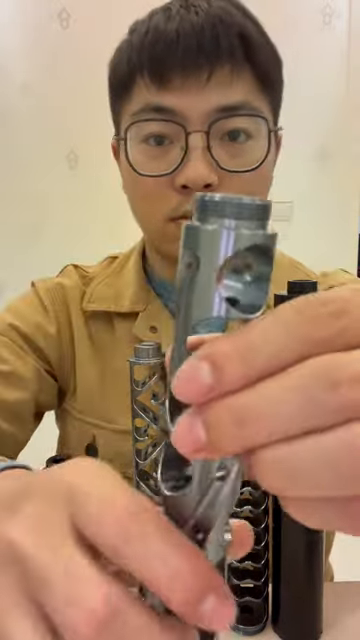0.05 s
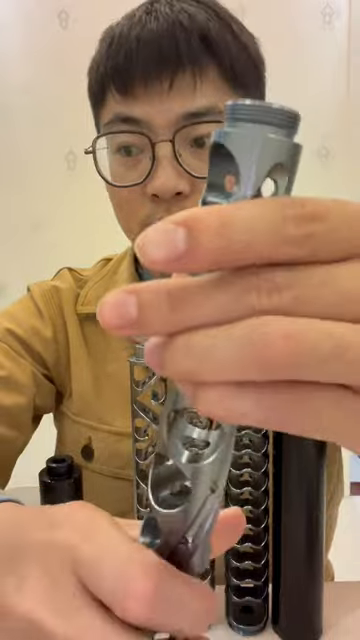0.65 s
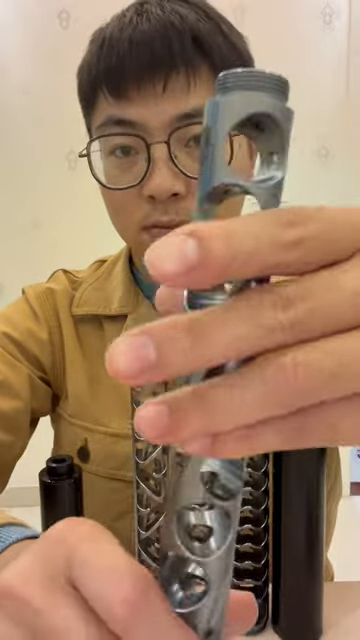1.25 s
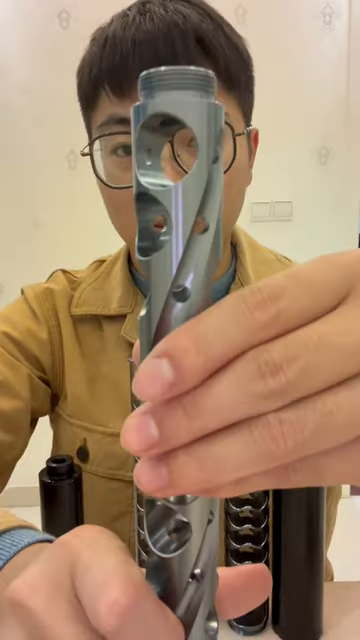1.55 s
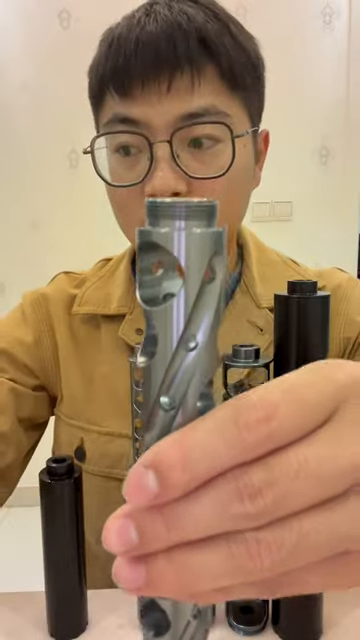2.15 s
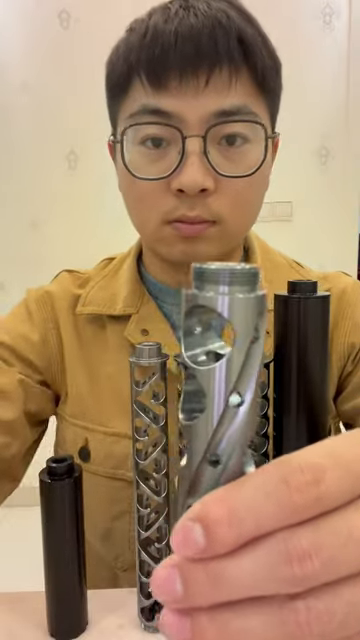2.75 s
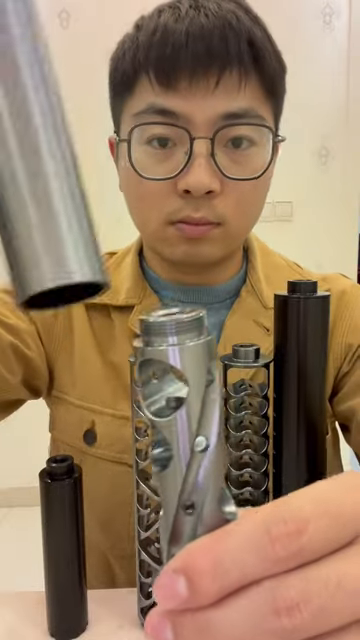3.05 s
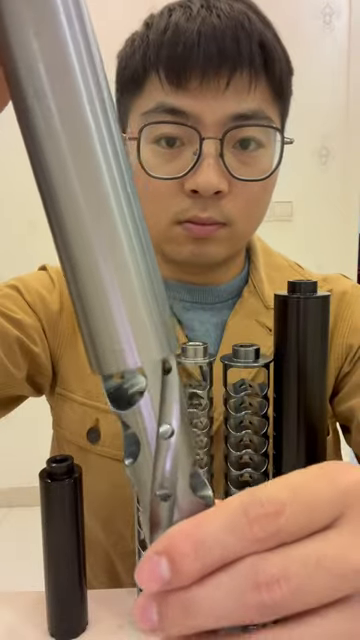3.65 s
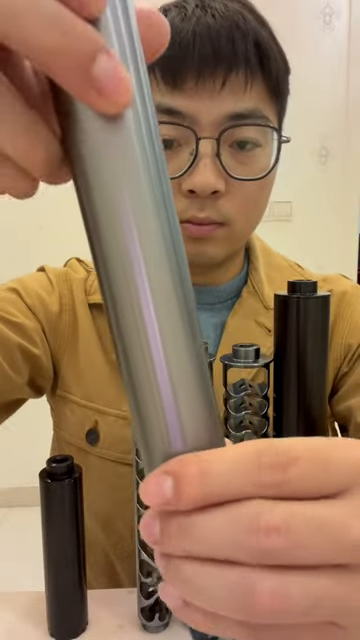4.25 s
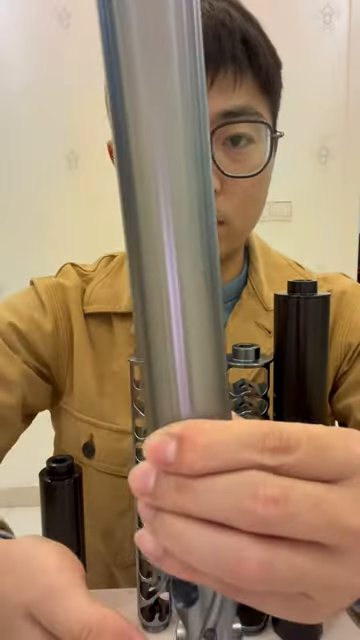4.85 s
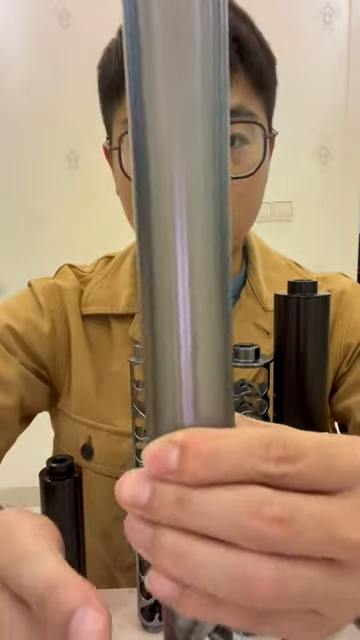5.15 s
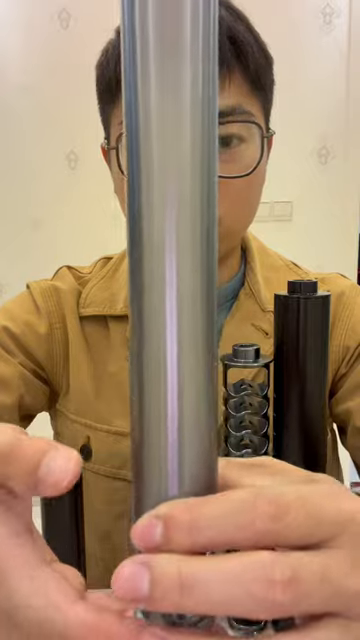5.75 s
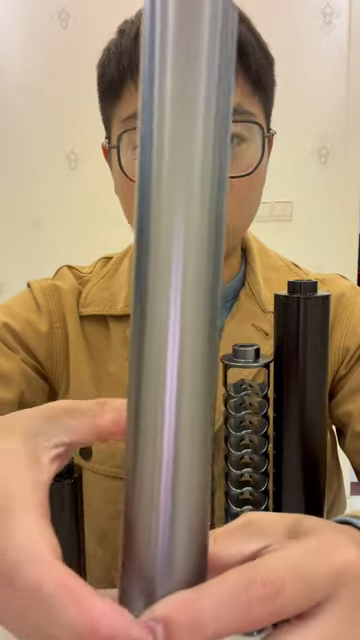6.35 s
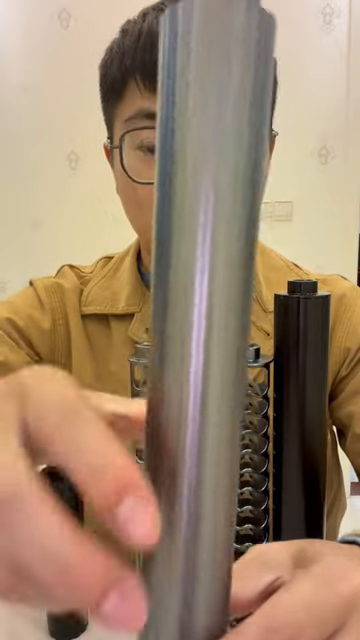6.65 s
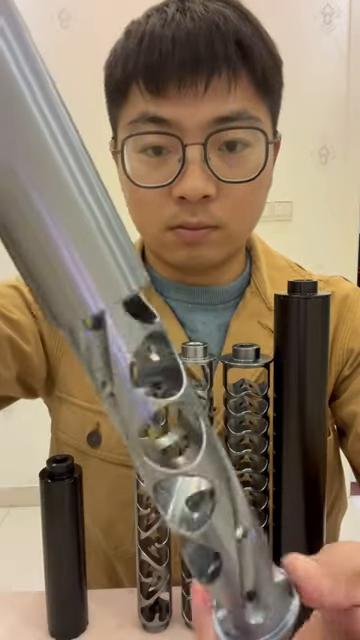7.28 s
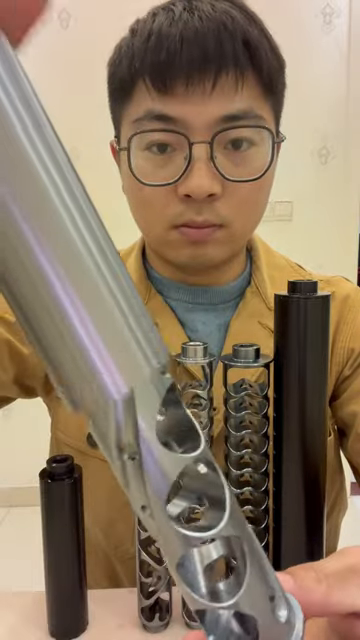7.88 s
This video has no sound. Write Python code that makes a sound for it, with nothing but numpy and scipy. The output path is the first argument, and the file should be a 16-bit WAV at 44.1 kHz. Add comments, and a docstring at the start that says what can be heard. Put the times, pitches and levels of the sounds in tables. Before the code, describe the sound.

Fingers rub a metal core, then a steel tube scrapes and rings down over it, seats with a clack and slides back off.

```python
"""A steel tube is knocked onto a perforated metal core, scraped down it, seated with a clack and drawn off.
Stick-slip friction and hard catches ring the tube's wall, its pitches shifting with the contact point.
The sliding also makes the core sing, and stirs the air inside into a boom and a hollow rasp.
Before that, fingers rub and tap the bare core, and its foot bumps the table.
A close two-port microphone hears it all in a small, quiet room."""
import sys
import numpy as np
from scipy import signal
from scipy.fft import rfft, irfft
from scipy.io import wavfile
from scipy.ndimage import uniform_filter1d

SR = 44100
rng = np.random.default_rng(int(sys.argv[2]) if len(sys.argv) > 2 else 0)


def materialize(psi):
    """Save the field psi as 16-bit PCM at rate SR to the path in sys.argv[1].

    A 1-D psi becomes a single channel; in a 2-D psi each row is a channel.
    """
    bounded = np.clip(np.atleast_2d(psi).T, -1, 1)
    quanta = np.round(bounded * 32767).astype(np.int16)
    wavfile.write(sys.argv[1], SR, quanta)


N = 353682
TIME, RING_TIME = np.arange(N) / SR, np.arange(16384) / SR
SLEEVED_S = 4.2  # from here on the tube sleeves the core


def amp(db):
    """Decibels to gain."""
    return 10 ** (np.asarray(db) / 20)


def unit_rms(x):
    """Normalises to rms 1."""
    return x / np.sqrt(np.mean(x ** 2) + 1e-20)


def curve_at(points, hz):
    """Reads a breakpoint curve along a log-frequency axis."""
    f, value = np.transpose(points)
    return np.interp(np.log(hz + 1), np.log(f + 1), value)


def fader(points):
    """Gain envelope through (t/s, level/dB) breakpoints."""
    return amp(np.interp(TIME, *np.transpose(points)))


def add(mix, s, sound):
    """Mixes a sound in at time s."""
    part = mix[round(s * SR):][:len(sound)]
    part += sound[:len(part)]


def swells(rows):
    """Gain envelope of smooth swells, each (centre/s, length/s, level/dB)."""
    gain = np.zeros(N)
    for s, length, db in rows:
        add(gain, max(s - length / 2, 0), amp(db) * np.hanning(round(length * SR)))
    return gain


def eq(x, spectrum):
    """Causal equaliser through (f/Hz, gain/dB) breakpoints."""
    log_gain = np.log(amp(curve_at(spectrum, abs(np.fft.fftfreq(2048, 1 / SR)))))
    taps = np.fft.ifft(np.exp(np.conj(signal.hilbert(log_gain)))).real
    return signal.oaconvolve(x, taps)[:len(x)]


def hit_at(x, db):
    """Sets the level of a hit's first 10 ms."""
    return amp(db) * x / np.std(x[:SR // 100])


def ringing(modes, detune=0):
    """Impulse response of decaying modes; the most damped ones are detuned most by the contact."""
    hz, db, t60 = np.transpose(modes)[:, :, None]
    hz = hz * (1 + detune * rng.standard_normal(hz.shape) * t60.min() / t60)
    decay = np.log(1000) / t60
    gain = rng.choice([-1, 1], hz.shape) * amp(db) * 2 * decay / SR
    return (gain * np.exp(-decay * RING_TIME) * np.sin(2 * np.pi * hz * RING_TIME)).sum(0)


def crack(t60):
    """Countless fast-dying modes as a noise burst of energy 1 that builds as the waves spread."""
    attack = 1 - np.exp(-RING_TIME / 0.00043)
    burst = rng.standard_normal(len(RING_TIME)) * amp(-60 * RING_TIME / t60) * attack
    return burst / np.linalg.norm(burst)


def grit(length, per_s, spread_db, hiss=0.14):
    """Force of a rough contact: tiny snags of unequal size over a smooth hiss."""
    size = amp(spread_db * np.minimum(rng.exponential(1, length), 4))
    snags = size * rng.choice([-1, 1], length) * (rng.random(length) < per_s / SR)
    return unit_rms(snags) + hiss * rng.standard_normal(length)


# dark room tone: f/Hz, relative level/dB
ROOM_TONE_EQ = [(18, -33.5), (30, -10), (113, -5.5), (1030, -16.5), (2190, -29), (2700, -30.5),
                (5730, -38.5), (10400, -44.5), (15000, -63.5)]
# its fader ride: t/s, level/dB
ROOM_TONE_RIDE = [(0, -73), (3.4, -67.5), (4.5, -76.5), (8, -74.5)]
def room_tone():
    """A quiet bed of noise, nearly alike at both ports."""
    shared, left, right = (unit_rms(eq(noise, ROOM_TONE_EQ)) for noise in rng.standard_normal((3, N)))
    return fader(ROOM_TONE_RIDE) * (shared + 0.065 * np.array([left, right]))


# small-room decay: f/Hz, t60/s
REVERB_DECAY = [(2000, 0.47), (10000, 0.28)]
def reverb(send):
    """Diffuse reflections, different at each port, dying faster in the treble."""
    t = np.arange(SR) / SR
    reflections = rng.standard_normal((2, SR)) * (rng.random((2, SR)) < .1) * (t > .005)
    hz, when, spectrum = signal.stft(reflections, SR)
    tail = signal.istft(spectrum * amp(-60 * when / curve_at(REVERB_DECAY, hz)[:, None]), SR)[1]
    return signal.fftconvolve(send[None], tail / np.linalg.norm(tail[0]), axes=1)[:, :N]


# handling rumble: t/s, level/dB
RUMBLE_RIDE = [(.42, -81), (.48, -62), (1, -73), (3.3, -70.5), (4.5, -95), (7.8, -83.5), (7.88, -63.5)]
def hand_rumble():
    """Moving hands make a low rumble."""
    return fader(RUMBLE_RIDE) * unit_rms(eq(rng.standard_normal(N), [(90, -13), (250, -34), (2000, -67)]))


# the core's foot landing: t/s, level/dB
BUMP_CUES = [(2.569, -47.5)]
# the table's body: f/Hz, relative peak/dB, t60/s
TABLE_MODES = [(110, 1.2, 0.62), (247, -0.97, 0.7), (382, 0.91, 0.21), (418, 1.4, 0.41)]
def table_bumps():
    """The core's foot thumps the table's low modes, with a dull attack."""
    out = np.zeros(N)
    for s, db in BUMP_CUES:
        thump = ringing(TABLE_MODES) + amp(-24) * eq(crack(t60=0.087), [(800, 6), (4000, -53)])
        add(out, s, hit_at(thump, db))
    return out


# the palm taking hold: t/s, level/dB, t60/s
PALM_CUE = (0.44, -69, 2.4)
# its muffled tone: f/Hz, relative level/dB
PALM_EQ = [(400, -9), (900, 1.5), (2300, -6), (3200, -22)]
def palm_brush():
    """Skin brushes the core, starting at once and fading."""
    s, db, t60 = PALM_CUE
    brush = unit_rms(eq(grit(N, per_s=1800, spread_db=0.5), PALM_EQ))
    return brush * (TIME > s) * amp(db - 60 * abs(TIME - s) / t60)


# the bare core's bright ring: f/Hz, relative peak/dB, t60/s
CORE_MODES = [(2970, -14.5, 0.17), (4614, -8.5, 0.12), (5530, 1.5, 0.12), (6770, -4.5, .2),
              (7410, -0.5, 0.14), (9090, -7, 0.21), (11250, -5, 0.033), (13600, -10.5, 0.12)]
# fingertip clinks: t/s, level/dB
TAP_CUES = [(0.058, -62), (1.404, -43.5)]
def finger_taps():
    """A fingertip rings the bare core, with a tick on the attack."""
    out = np.zeros(N)
    for s, db in TAP_CUES:
        add(out, s, hit_at(ringing(CORE_MODES) + amp(-29.5) * crack(t60=0.033), db))
    return out


# finger strokes on the metal: centre/s, length/s, drive level/dB
STROKE_CUES = [(0.06, 0.084, -64.5), (0.177, 0.29, -70), (0.583, 0.2, -74.5), (0.789, 0.29, -73.5),
               (1.024, 0.18, -79.5), (1.31, 0.31, -74), (2.572, 0.18, -67.5), (2.952, 0.39, -76),
               (4.389, 0.12, -63), (4.8, 0.69, -73.5)]
# the tightening grip chokes the rubbed core's ring: t/s, gain/dB
GRIP_CHOKE = [(1.5, 3.5), (1.8, -27.5)]
# the metal's wash of short-lived modes, shared with the tube: f/Hz, gain/dB
CLATTER_EQ = [(150, -68.5), (370, -30.5), (560, -35), (780, -18.5), (1700, -15), (2500, -18.5),
              (3500, -19.5), (5000, -29.5), (6700, -16.5), (8100, -27.5), (9500, -22.5), (10400, -35.5),
              (12200, -28.5), (15500, -47)]
def finger_rubs(resting_grip_db=-89):
    """Skin friction feeds the core's modes almost evenly while damping them."""
    skin = eq(grit(N, per_s=1800, spread_db=2), [(500, -12), (2500, -7.5), (11500, 5), (15000, -17.5)])
    damped_modes = [(hz, .25 * db, t60 / 2) for hz, db, t60 in CORE_MODES]
    ring = fader(GRIP_CHOKE) * unit_rms(signal.oaconvolve(skin, ringing(damped_modes))[:N])
    scuff = unit_rms(eq(skin, CLATTER_EQ))
    return (amp(resting_grip_db) + swells(STROKE_CUES)) * (amp(4.5) * ring + scuff)


# swells of trapped air: centre/s, length/s, level/dB
BOOM_CUES = [(4.01, 0.34, -56.5), (7.92, 0.045, -51.5)]
# their boxy tone: f/Hz, relative level/dB
BOOM_EQ = [(150, -29.5), (330, -10.5), (450, 3.5), (650, -4.5), (1200, -51.5)]
def air_boom():
    """Friction stirs the air inside the tube while the core plugs its mouth."""
    return swells(BOOM_CUES) * unit_rms(eq(rng.standard_normal(N), BOOM_EQ))


# hollow rasp as the tube breaks loose: t/s, level/dB, f/Hz
RASP_SWEEP = [(6.919, -72.5, 1750), (6.955, -44, 1463), (6.974, -41, 1137), (7.02, -87, 1020)]
def cavity_rasp(width_hz):
    """Friction sounds a cavity whose pitch falls as the tube withdraws."""
    s, db, hz = np.transpose(RASP_SWEEP)
    carrier = np.exp(2j * np.pi * np.cumsum(np.interp(TIME, s, hz)) / SR)
    pole = np.exp(-np.pi * width_hz / SR)
    hollow = (carrier * signal.lfilter([1], np.poly([pole, pole]), rng.standard_normal(N))).real
    return unit_rms(hollow) * amp(np.interp(TIME, s, db)) * (TIME > s[0]) * (TIME < s[-1])


def core_singing(send_db=-19.5, swing_db=6, fit_s=0.06):
    """The sliding sleeve rubs the core's three lowest modes into separate tones that come in fits."""
    fits, out = np.arange(0, N / SR, fit_s), np.zeros(N)
    friction = shove_gains()[0] * (TIME > SLEEVED_S) * rng.standard_normal(N)
    for hz, _, t60 in CORE_MODES[:3]:
        coupling = amp(swing_db * np.clip(rng.standard_normal(len(fits)), -1, 1))
        tone = ringing([(hz, 0, t60)])
        drive = friction * np.interp(TIME, fits, coupling)
        out += signal.oaconvolve(drive, tone / np.linalg.norm(tone))[:N]
    return amp(send_db) * out


# the tube's wall, damped by hand and core or ringing free: f/Hz, relative peak/dB, t60/s
TUBE_MODES = [(1946, -9, 0.049), (2915, -10.5, 0.32), (3350, -12.5, 0.073), (3674, 5, 0.056),
              (3736, -0.5, 0.031), (4516, -15, .1), (5600, -17, 0.16), (6208, -1, 0.034),
              (6510, -8.5, 0.031), (7524, -7, 0.049), (8495, -10.5, 0.035), (9580, -14.5, 0.047),
              (11350, -20, 0.012), (12400, -33, 0.029), (3746, -5.5, 0.89)]
# crossover into ring, knock and bright bands: low f/Hz, high f/Hz
TUBE_BANDS = [(2800, 5000), (30, 2800), (5000, 17000)]
def tube_response(clatter_db):
    """The wall's answer to a click at one contact point: ring, knock and bright bands, energy 1 each."""
    wall = ringing(TUBE_MODES, detune=0.0082) + amp(clatter_db) * eq(crack(t60=0.038), CLATTER_EQ)
    low_cut = signal.butter(2, 260, "highpass", fs=SR, output="sos")  # a slim tube radiates no bass
    wall = signal.sosfilt(low_cut, wall)
    crossover = [signal.firwin(129, edges, pass_zero=False, fs=SR) for edges in TUBE_BANDS]
    bands = np.array([np.convolve(wall, taps, "same") for taps in crossover])
    return bands / np.linalg.norm(bands, axis=1, keepdims=True)


# the hand slides the tube on, home and off, from firm shoves to faint creeps:
# t/s, length/s, ring level/dB, brightness re ring/dB
SHOVE_CUES = [(3.581, 0.06, -29.5, -4), (3.625, 0.19, -25, 0), (3.654, 0.047, -21, 4.5),
              (3.809, 0.26, -22, 0), (4.985, 0.018, -46.5, -2), (5.038, 0.07, -41, -4.5),
              (5.098, 0.013, -25, 1), (5.182, 0.17, -45, -4.5), (5.36, 0.24, -37.5, -0.5),
              (5.764, 0.14, -56, 6.5), (5.928, 0.21, -59.5, 1.5), (6.92, 0.17, -43.5, 4.5),
              (7.078, 0.29, -50.5, 6.5), (7.28, 0.094, -40, -14), (7.432, 0.13, -41.5, -0.5),
              (7.595, 0.071, -47.5, -8.5), (7.675, 0.31, -63, 4), (7.86, 0.29, -40, 2),
              (7.952, 0.081, -32, 13.5)]
def shove_gains(rise_s=0.027, fade_db_per_s=339.5, cups_per_s=15, cup_swell_db=1.5):
    """Ring, knock and bright envelopes: shoves rise, hold and fade, pulsing as the rim crosses cups."""
    ring_power, bright_power = np.zeros((2, N))
    for start, length, push_db, bright_db in SHOVE_CUES:
        t = TIME[:round((length + 60 / fade_db_per_s) * SR)]
        fade_db = fade_db_per_s * np.maximum(t - length, 0)
        cups_db = cup_swell_db * np.cos(2 * np.pi * cups_per_s * t)
        gain = np.minimum(t / rise_s, 1) * amp(push_db - fade_db - cups_db)
        add(ring_power, start, gain ** 2)
        add(bright_power, start, (gain * amp(bright_db)) ** 2)
    ring, bright = np.sqrt([ring_power, bright_power])
    knock = amp(-19.5) * ring ** 0.75  # gains less than the ring from a harder push
    return np.array([ring, knock, bright])


def tube_scrape(free, sleeved, snags_per_s, spread_db, judder_db):
    """Stick-slip friction drives the wall, crossfading from one contact point to the next."""
    slips = np.arange(0, N / SR, .005)
    judder = amp(judder_db * np.interp(TIME, slips, rng.standard_normal(len(slips))))
    force = grit(N, snags_per_s, spread_db) * judder
    force /= np.sqrt(uniform_filter1d(force ** 2, size=1800))  # the hand's push evens out the snags
    hop, out = 1024, np.zeros(N)
    drive = np.pad(force * shove_gains(), ((0, 0), (0, 2 * hop)))
    for at in range(round(SHOVE_CUES[0][0] * SR) - hop, N, hop):
        grain = drive[:, at:at + 2 * hop] * signal.windows.hann(2 * hop, sym=False)
        contacts = free if at < SLEEVED_S * SR else sleeved
        contact = contacts[(at // hop) % len(contacts)]
        if grain.any():
            add(out, at / SR, signal.fftconvolve(grain, contact, axes=1).sum(0))
    return out


def tube_hit(contact, ring_db, bright_db, chatter_s):
    """A blow or a short chatter of rebounds rings the wall at one contact point."""
    t = RING_TIME[:SR // 20]
    force = grit(len(t), per_s=5400, spread_db=1) * np.exp(-(t / chatter_s) ** 2)
    force[0] += 1  # the first touch
    bands = signal.fftconvolve(force[None], contact, axes=1)
    knock_db = -28 + 0.45 * ring_db  # gains less than the ring from a harder blow
    return sum(map(hit_at, bands, [ring_db, knock_db, ring_db + bright_db]))


# the tube snags on the core's edges: t/s, ring level/dB, brightness re ring/dB
CATCH_CUES = [(3.4215, -35, 0), (3.44, -44, 2.5), (3.4785, -41.5, -7), (3.5364, -35.5, 11),
              (3.5585, -23.5, 5), (3.5704, -16, 0), (3.7612, -18, 4.5), (3.778, -27, 7.5),
              (3.93, -19.5, 0.5), (4.339, -48.5, 2), (4.6078, -62, 2), (4.667, -71.5, 5),
              (4.9689, -55.5, 10), (5.0507, -37.5, 1.5), (5.109, -30.5, -1.5), (5.1755, -37, 3.5),
              (5.2997, -31.5, 4.5), (5.372, -41.5, 1), (5.396, -36.5, 13), (5.413, -47, 21),
              (5.477, -25.5, -4), (5.493, -29.5, 3), (5.581, -33.5, -2), (5.9173, -50.5, 3.5),
              (6.139, -20.5, -1), (6.7589, -72.5, 18), (6.84, -69.5, 8), (7.0562, -38, 8), (7.369, -70, -7),
              (7.4987, -36.5, -2.5), (7.5361, -40, 6), (7.795, -56, -2), (7.9063, -21, -1.5),
              (7.9726, -47, 4)]
def tube_catches(free, sleeved, blow_s=0.0006, chatter_s=0.0035, shove_rise_s=0.027):
    """Each catch is one clean blow while the tube rests, a run of rebounds while it slides."""
    out = np.zeros(N)
    for k, (s, ring_db, bright_db) in enumerate(CATCH_CUES):
        contacts = free if s < SLEEVED_S else sleeved
        contact = contacts[k % len(contacts)]
        sliding = any(start + shove_rise_s < s < start + length for start, length, *_ in SHOVE_CUES)
        add(out, s, tube_hit(contact, ring_db, bright_db, chatter_s if sliding else blow_s))
    return out


# the clack's pitch, the lowest wall mode as a close pair: f/Hz, relative peak/dB, t60/s
CLACK_MODES = [(1895, -2.5, 0.085), (1980, -0.1, 0.075)]
def seating_clack(contact, at_s, rebound_s):
    """The tube hits its end stop, rings its lowest wall mode and rebounds with a rattle."""
    out = np.zeros(N)
    clack = np.diff(ringing(CLACK_MODES))  # radiates no bass
    add(out, at_s, hit_at(clack, db=-29.5))
    add(out, at_s + rebound_s, tube_hit(contact, ring_db=-25, bright_db=-5.5, chatter_s=0.012))
    return out


def scene():
    """Tube, core and hands in the room; the tube rings while free and clatters more once sleeved."""
    free, sleeved = ([tube_response(clatter_db) for _ in range(10)] for clatter_db in (-4, 1.5))
    foley = tube_catches(free, sleeved) + seating_clack(sleeved[0], at_s=6.1395, rebound_s=0.009)
    foley += finger_rubs() + finger_taps() + table_bumps() + hand_rumble() + palm_brush()
    foley += air_boom() + core_singing() + cavity_rasp(width_hz=330)
    foley += tube_scrape(free, sleeved, snags_per_s=1500, spread_db=3.5, judder_db=2.5)
    return foley + reverb(eq(foley, [(2000, -8.5), (4000, -13)])) + room_tone()


# phase lead of the left microphone port: f/Hz, lead/rad
PORT_PHASE = [(5300, 0), (7400, .7), (9650, 1.8), (10800, 3)]
def record(dry):
    """Two microphone ports part in phase in the treble, then pass a soft clip and a high cut."""
    lead = curve_at(PORT_PHASE, np.fft.rfftfreq(2 * N, 1 / SR))
    ports = irfft(rfft(dry, 2 * N) * np.exp(.5j * np.array([lead, -lead])))[:, :N]
    ports = np.tanh(ports)  # the input stage rounds the hardest peaks
    high_cut = signal.firwin(511, 15900, window=("kaiser", 9), fs=SR)
    return signal.oaconvolve(ports, high_cut[None], "same")


dry = scene()
out = record(dry)
materialize(out)
```